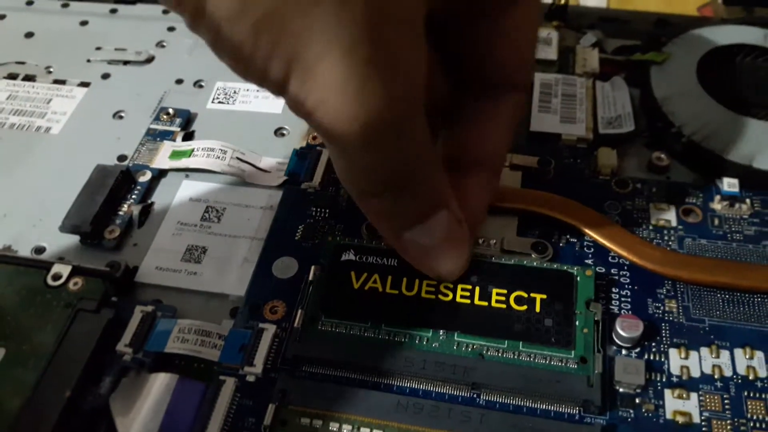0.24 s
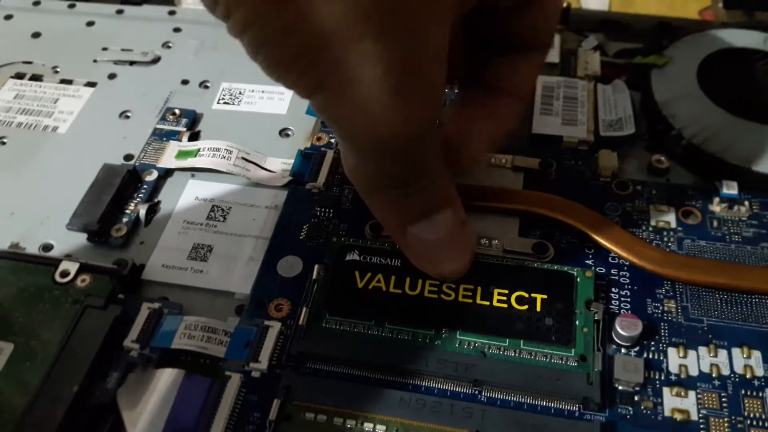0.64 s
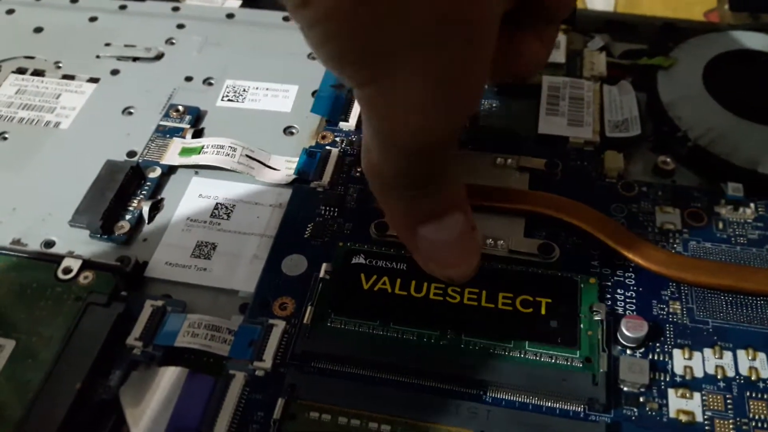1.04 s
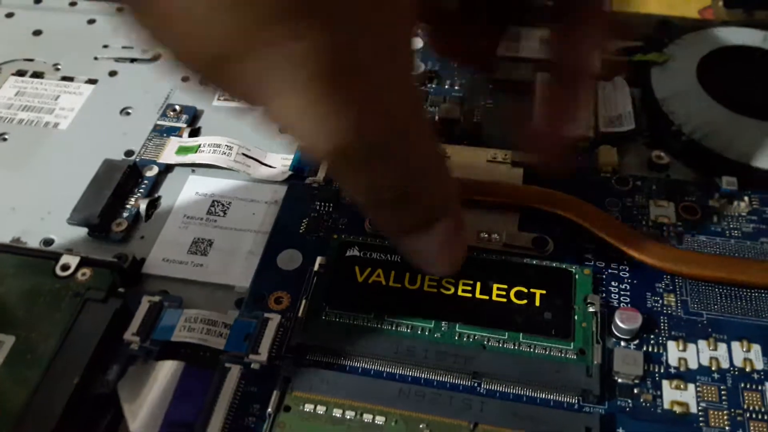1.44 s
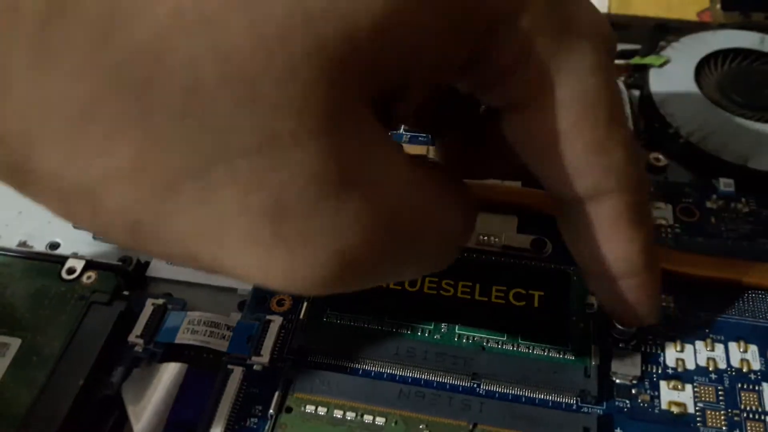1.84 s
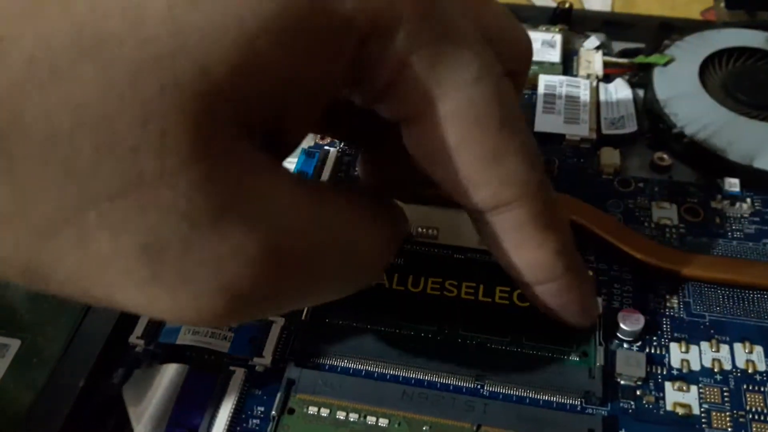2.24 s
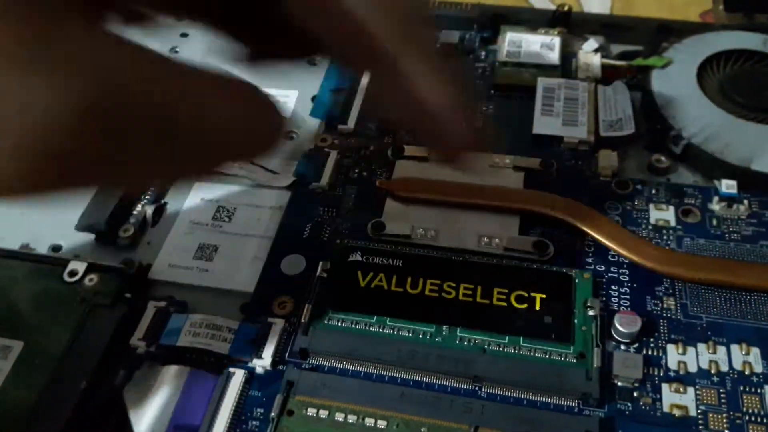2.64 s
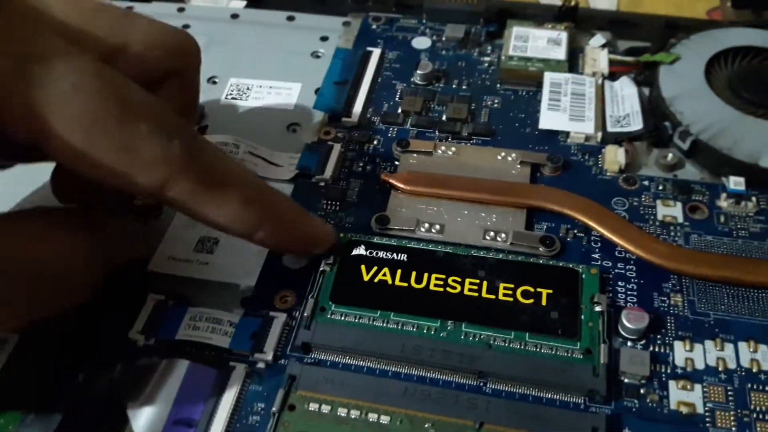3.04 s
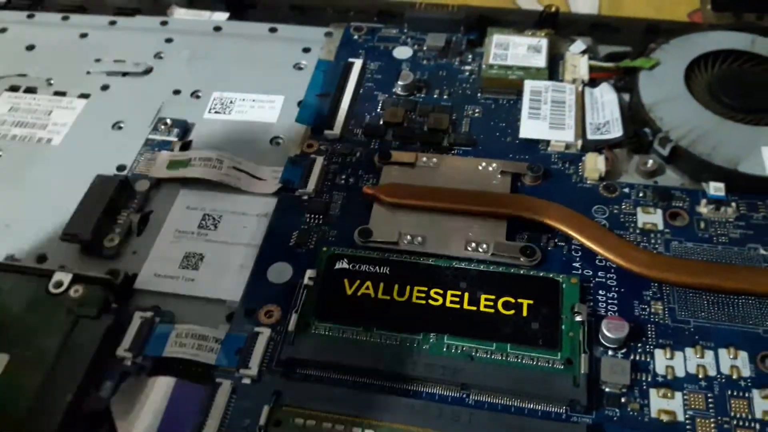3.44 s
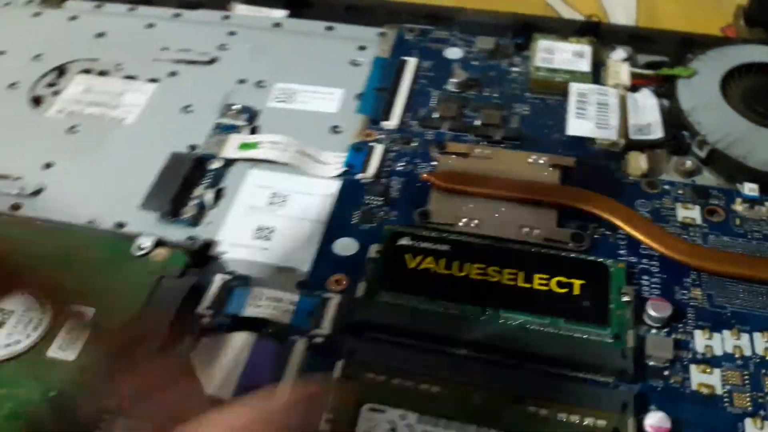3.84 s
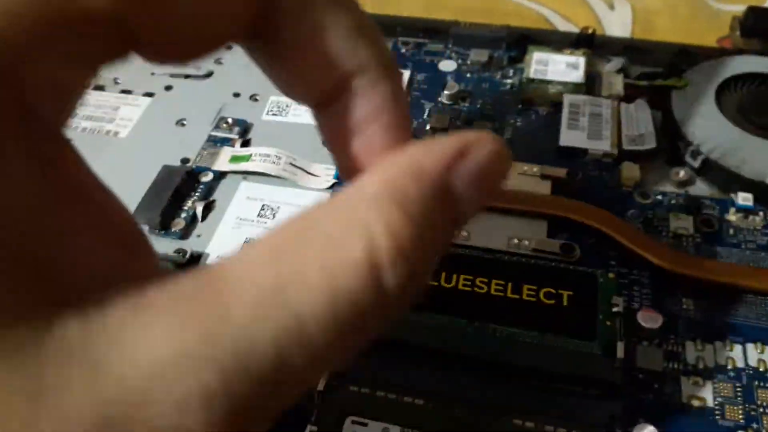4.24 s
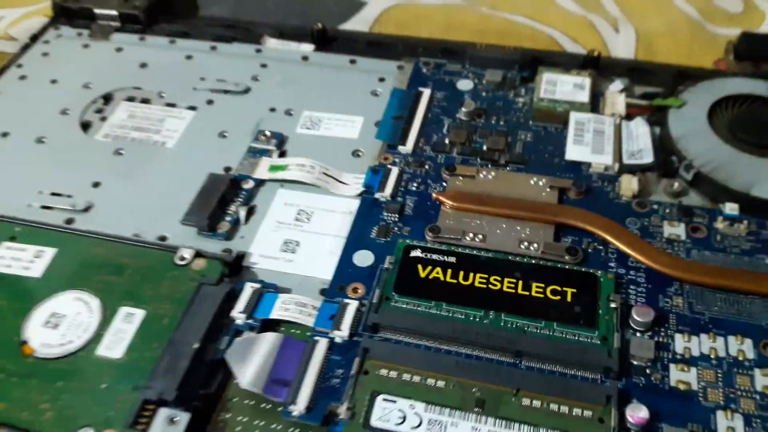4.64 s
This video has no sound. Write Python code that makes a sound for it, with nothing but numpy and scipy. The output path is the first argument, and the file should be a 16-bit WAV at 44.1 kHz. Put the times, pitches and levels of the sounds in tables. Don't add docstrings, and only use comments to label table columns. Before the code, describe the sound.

Fingers tick on a circuit board, a module snaps hard into its slot, then wind-like thumps and fainter ticks over quiet room hum.

```python
import sys
import numpy as np
from scipy import signal
from scipy.fft import rfft, irfft, next_fast_len
from scipy.io import wavfile
from scipy.ndimage import uniform_filter1d, minimum_filter1d

SR = 44100
rng = np.random.default_rng(int(sys.argv[2]) if len(sys.argv) > 2 else 0)


def wrap_up_sound(samples):
    columns = np.atleast_2d(samples).T
    tamed = np.clip(columns, -1, 1)
    steps = np.round(tamed * 32767).astype(np.int16)
    wavfile.write(sys.argv[1], SR, steps)


def level_to_linear(level):
    exponent = np.asarray(level, float) / 20
    return 10 ** exponent


N = 211259
TIME_S = np.arange(N) / SR

# start_s, level_db
ROOM_LEVEL = [
    (0.0, -39),
    (0.33, -37.5),
    (0.99, -39),
    (1.24, -43.5),
    (1.88, -49),
    (2.15, -46.5),
    (2.53, -40),
    (2.87, -38.5),
    (3.55, -38.5),
    (4.79, -38.5),
]
ECHO_T60_S = 0.26


def rms_one(x):
    return x / np.sqrt(np.mean(x ** 2) + 1e-20)


def room_level_db():
    s, level_db = np.transpose(ROOM_LEVEL)
    return np.interp(TIME_S, s, level_db)


def at_hz(points, hz):
    table_hz, values = np.array(points)[:, 0], np.array(points)[:, 1]
    return np.interp(np.log(hz), np.log(table_hz), values)


def sides(lean_db):
    return level_to_linear(np.array([lean_db / 2, -lean_db / 2]))


def drift(rate_hz):
    r = np.exp(-80 * np.pi * rate_hz / SR)
    steps = rng.standard_normal(N // 40 + 2002)
    slow = rms_one(signal.lfilter([1], [1, -2 * r, r * r], steps)[2000:])
    return np.interp(np.arange(N) / 40, np.arange(len(slow)), slow)


def bumps(rows):
    s, level_db, half_s = np.transpose(rows)[:, :, None]
    return np.sum(level_to_linear(level_db) * np.exp(-((TIME_S - s) / half_s) ** 2), axis=0)


def resonate(x, hz, width_hz):
    r = np.exp(-np.pi * width_hz / SR)
    top = [(1 - r * r) / 2, 0, (r * r - 1) / 2]
    bottom = [1, -2 * r * np.cos(2 * np.pi * hz / SR), r * r]
    return signal.lfilter(top, bottom, signal.lfilter(top, bottom, x))


def stereo_noise(spectrum, likeness, lean):
    size = next_fast_len(N)
    hz = np.maximum(np.arange(size // 2 + 1) * SR / size, 1)
    mid, side = rfft(rng.standard_normal((2, size)))
    alike = np.clip(at_hz(likeness, hz), 0, 1)
    pair = np.sqrt(1 + alike) * mid + np.sqrt(1 - alike) * side * [[1], [-1]]
    colour = (hz < 15850) * level_to_linear(at_hz(spectrum, hz))
    pair = pair * colour * sides(at_hz(lean, hz))
    return rms_one(irfft(pair, size)[:, :N])


def snap():
    # start_s, strength_db, left_minus_right_db
    contacts = [
        (0.999, -41.5, 7.5),
        (0.9999, -3.5, -2.5),
        (0.9997, -4.5, 6.5),
        (1.0007, -8.5, -5),
        (1.0012, 3, -8),
        (1.0013, 0.5, 4.5),
        (1.0028, -6.5, -10),
        (1.0038, -14.5, -6.5),
        (1.0036, -24, 2),
        (1.007, -7.5, -9),
    ]
    s, strength_db, lean_db = np.transpose(contacts)
    length = round(1.5 * SR)
    force = np.full((2, length), 1e-18)
    force[:, np.round(s * SR).astype(int)] = level_to_linear(strength_db) * sides(lean_db)
    force = signal.lfilter([1], [1, -np.exp(-1 / (0.00059 * SR))], force)
    out = np.zeros((2, N))
    out[:, :length] = board_ring(force) + crack(force)
    return level_to_linear(5) * out + snap_echo(s[1])


def board_ring(force):
    # pitch_hz, level_db, t60_s, left_minus_right_db
    board = [(105, -27, 0.041, -32), (286.6, -21.5, 0.052, -4), (520, -14.5, 0.023, 0),
             (647, -16.5, 0.05, -7.5), (1100, -18, 0.032, 13), (1320, -10, 0.0041, -15.5),
             (1730, -4.5, 0.0097, -2.5), (2254, 0, 0.012, 5.5), (3195, -15, 0.021, -4),
             (3600, 0, 0.0083, -2.5), (4060, -6, 0.0062, 3), (4960, -8.5, 0.0062, -9.5),
             (5670, -5, .006, -9.5), (6560, -8.5, 0.007, -8.5), (7030, -7.5, 0.0061, -4.5)]
    # pitch_hz, level_db, t60_s, left_minus_right_db
    latches = [(2257, -29, 0.073, -3), (2256, -20.5, .1, -2.5), (2360, -28, 0.11, -1),
               (2500, -26, .09, -0.5), (2584, -27, 0.1, 0), (3190, -28, .07, -1.5), (3600, -28, .07, -2.5),
               (3818, -23.5, .07, -1.5)]
    out = np.zeros_like(force)
    for hz, level_db, t60_s, lean_db in [*board, *latches]:
        shared, left, right = rng.standard_normal((3, force.shape[1]))
        scrape = force * (shared + 0.65 * np.array([left, right]))
        r = level_to_linear(-60 / (t60_s * SR))
        turn = 2 * np.pi * hz / SR
        ring = signal.lfilter([0, np.sin(turn)], [1, -2 * r * np.cos(turn), r * r], scrape)
        ring /= np.abs(ring).max(axis=1, keepdims=True)
        out += level_to_linear(level_db) * sides(lean_db)[:, None] * ring
    return out


def crack(force):
    colour = [(300, -28.5), (3000, -18), (8000, 4.5), (16000, 1.5)]   # pitch_hz, level_db
    noise = stereo_noise(colour, [(1, 0.58)], [(1, 1.6)])
    return level_to_linear(-10) * force * noise[:, :force.shape[1]]


def snap_echo(start_s):
    # pitch_hz, level_db (per Hz)
    echo_colour = [(250, -10), (600, -9), (1740, -7.5), (2050, -4), (2350, 4), (2750, -15), (3300, -3.5),
                   (4300, -9), (4900, -13.5), (7500, -15), (9000, -22), (12800, -19), (15500, -27)]
    t = np.maximum(TIME_S - start_s, 0)
    build_up = 1 - np.exp(-t / 0.0016)
    fade = level_to_linear(-18.5 - 60 * t / ECHO_T60_S)
    return fade * build_up * stereo_noise(echo_colour, [(1, 0.1)], [(1, -4.5)])


def ticks():
    # start_s, peak_db, strongest_hz, fall_db (per octave away from it), dying_s
    nail_ticks = [(0.1178, -14.5, 1100, 33, .0015), (.304, -54, 10000, 6, .012),
                  (0.4134, -20, 2400, 5.5, 0.00055), (.56, -35, 2600, 23, .003),
                  (.7785, -34.5, 11700, 0, 0.00083), (1.4866, -50.5, 10500, 8, .0038),
                  (2.024, -36.5, 2800, 16, 0.0014), (2.29, -35.5, 3500, 29, 0.0065),
                  (3.137, -39, 4000, 14, 0.0033), (3.1495, -33, 4960, 14, .0008),
                  (3.312, -32.5, 3000, 13, 0.0028), (3.561, -52, 9500, 1, .0006),
                  (3.5653, -13, 8600, 19, 0.00026)]
    # pitch_hz, width_hz, level_db, left_minus_right_db
    nail_rings = [(1100, 600, -11, -4), (2400, 780, 3.7, -3), (3690, 450, -6.5, 9), (5280, 1460, 1, -10.5),
                  (8600, 1070, -2, 5.5), (11830, 1900, 2.2, -3), (14700, 2000, -0.5, 5)]
    out = np.zeros((2, N))
    t = np.arange(9000) / SR
    reflections = level_to_linear(-43 - 60 * t / ECHO_T60_S)
    for s, peak_db, strongest_hz, fall_db, dying_s in nail_ticks:
        burst = rng.standard_normal((2, len(t)))
        burst = burst + 0.5 * burst[0]
        burst = burst * (np.exp(-t / dying_s) + reflections)
        i = round(s * SR)
        for hz, width_hz, ring_db, lean_db in nail_rings:
            ring = resonate(burst, hz, width_hz)
            ring /= np.abs(ring).max(axis=1, keepdims=True)
            octaves_away = abs(np.log2(hz / strongest_hz))
            level_db = peak_db + ring_db - fall_db * octaves_away
            out[:, i:i + len(t)] += level_to_linear(level_db) * sides(lean_db)[:, None] * ring
    return out


def puffs():
    # start_s, peak_db, pitch_hz, half_length_s
    air_puffs = [
        (2.903, -32, 100, .010),
        (2.964, -19, 153, 0.0053),
        (2.998, -12.5, 142, 0.0043),
        (3.055, -27.5, 121, .012),
        (3.126, -29, 101, 0.015),
        (3.195, -30, 80, 0.0099),
        (3.213, -23, 134, 0.0063),
    ]
    out = np.zeros((2, N))
    for s, peak_db, hz, half_s in air_puffs:
        t = TIME_S - s
        out[1] += level_to_linear(peak_db) * np.exp(-(t / half_s) ** 2) * np.cos(2 * np.pi * hz * t)
    return out


def buffeting():
    # start_s, level_db (against the room level), half_length_s
    gusts = [(.33, -11, .04), (.6, -4, 0.078), (2.87, 7, 0.037), (2.99, -18, 0.034), (3.1, 2.5, 0.13),
             (3.2, 0, 0.036), (3.36, -4, 0.07), (3.8, -16, .04), (3.92, -12, 0.046), (4.47, -11, .04),
             (4.65, -11, .05)]
    calm_db = -15
    gust_db = 20 * np.log10(1 + bumps(gusts) / level_to_linear(calm_db))
    band = signal.butter(2, [55, 120], "band", fs=SR, output="sos")
    rumble = rms_one(signal.sosfilt(band, rng.standard_normal((2, N))))
    level_db = room_level_db() + calm_db + gust_db - 8 + 1.74 * drift(25)
    return rumble * level_to_linear(level_db) * sides(-3 - 0.54 * gust_db)


def room_noise():
    return level_to_linear(room_level_db() + 2.5) * (fan_rush() + fan_drone())


def fan_rush():
    # pitch_hz, level_db (per Hz)
    rush_colour = [(30, -30.5), (82, -16), (120, -8.5), (160, -4.5), (248, -8), (298, -4.5), (399, -5),
                   (625, -13.5), (1030, -10), (5890, -37.5), (7600, -41.5), (8600, -45.5), (14800, -48)]
    # pitch_hz, likeness (1 is the same)
    room_likeness = [(60, 0.95), (180, 1), (550, 0.63), (1650, 0.26), (4970, 0.02), (15000, 0.01)]
    # pitch_hz, left_minus_right_db
    room_lean = [(60, -5), (180, -6), (550, -3.5), (1650, -5.5), (4970, -7), (15000, 1)]
    # pitch_hz, width_hz, level_db (against the room level)
    hum = [(379.4, 27, -18.5), (965, 180, -13), (2102, 740, -16.5), (7020, 730, -32.5)]
    rush = level_to_linear(-0.36 + 0.5 * drift(6.7)) * stereo_noise(rush_colour, room_likeness, room_lean)
    for hz, width_hz, level_db in hum:
        likeness, lean_db = at_hz(room_likeness, hz), at_hz(room_lean, hz)
        white = stereo_noise([(1, 0)], [(1, likeness)], [(1, lean_db)])
        rush += level_to_linear(level_db) * rms_one(resonate(white, hz, width_hz))
    return rush


def fan_drone():
    # start_s, level_db (against the room level)
    swells = [(.01, -1.5), (.19, -2.5), (.37, 3), (.57, 1), (.72, -1.5), (1.33, -4), (1.55, -7),
              (2.0, -4.5), (2.46, -4), (2.86, 1.5), (3.23, -5), (3.4, -7), (3.61, -5.5), (3.92, 1),
              (4.08, -9.5), (4.39, -8), (4.78, -6.5)]
    half_length_s = 0.062
    swell = level_to_linear(-8.5) + bumps([(s, level_db, half_length_s) for s, level_db in swells])
    pitch_hz = 140 + 3.304 * drift(4.0)
    tone = np.sin(np.cumsum(2 * np.pi * pitch_hz / SR))
    return swell * level_to_linear(-3.5) * tone * sides(-5.5)[:, None]


def scene():
    return snap() + ticks() + puffs() + buffeting() + room_noise()


def low_pass(x):
    return signal.sosfilt(signal.butter(12, 16860, fs=SR, output="sos"), x)


def record(dry):
    dry = signal.sosfilt(signal.butter(2, 45, "high", fs=SR, output="sos"), dry)
    dry = signal.sosfilt(signal.cheby2(10, 50, 16900, fs=SR, output="sos"), dry)
    ceiling, release_db_per_s, look_ahead_s = 1.29, 906, 0.015
    over_db = np.maximum(20 * np.log10(np.abs(dry).max(axis=0) / ceiling + 1e-9), 0)
    ramp = release_db_per_s * TIME_S
    over_db = np.maximum.accumulate(over_db + ramp) - ramp
    ahead = round(look_ahead_s * SR)
    cut_db = minimum_filter1d(-over_db, ahead, origin=-(ahead // 2))
    cut_db = uniform_filter1d(cut_db, ahead // 2)
    return low_pass(np.clip(dry * level_to_linear(cut_db), -1, 1))


dry = scene()
out = record(dry)
wrap_up_sound(out)
```